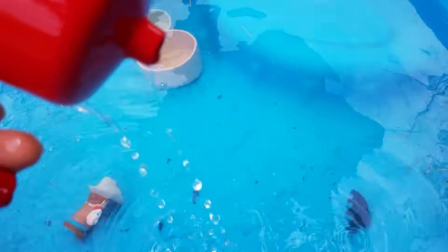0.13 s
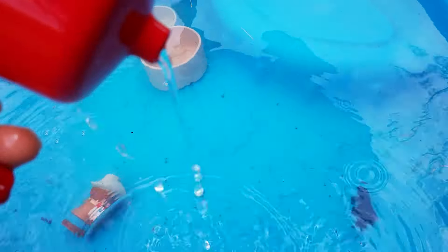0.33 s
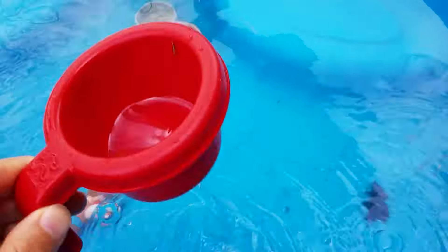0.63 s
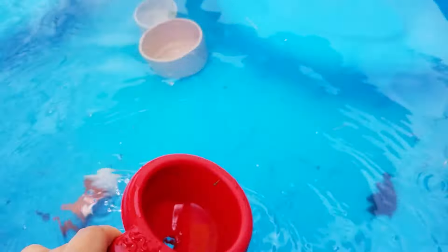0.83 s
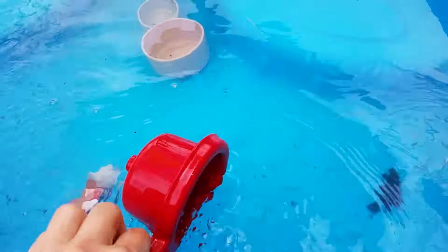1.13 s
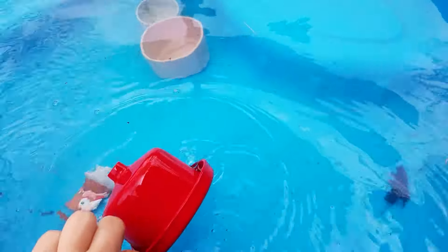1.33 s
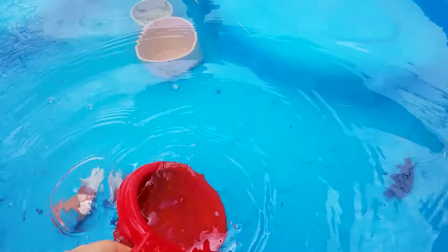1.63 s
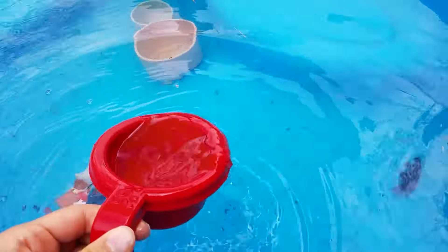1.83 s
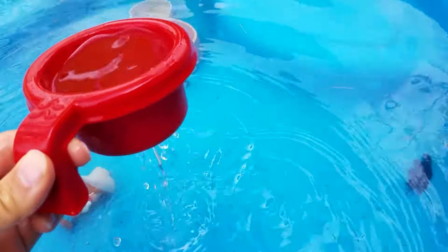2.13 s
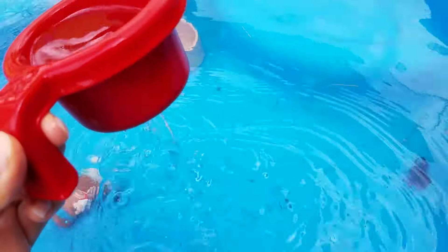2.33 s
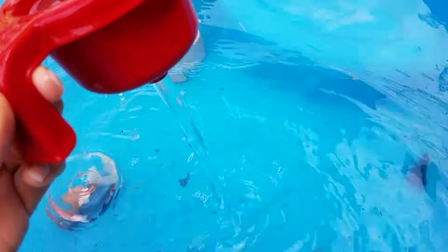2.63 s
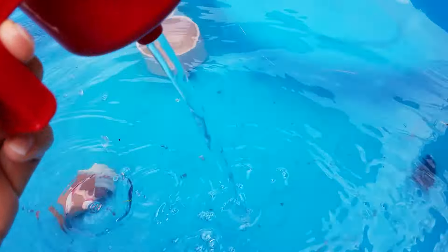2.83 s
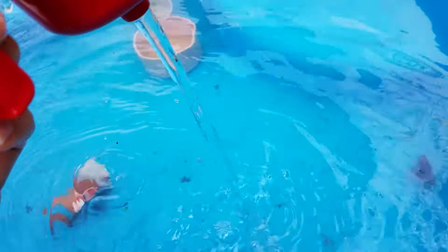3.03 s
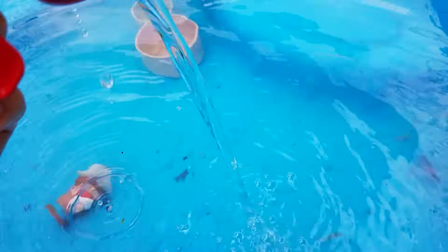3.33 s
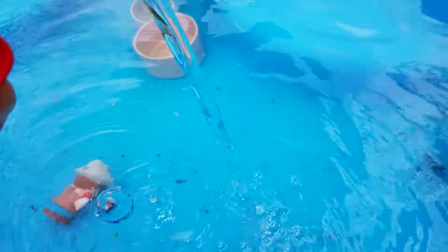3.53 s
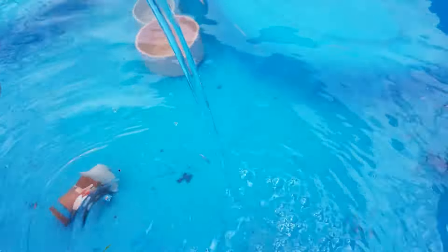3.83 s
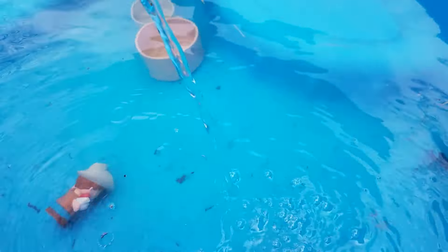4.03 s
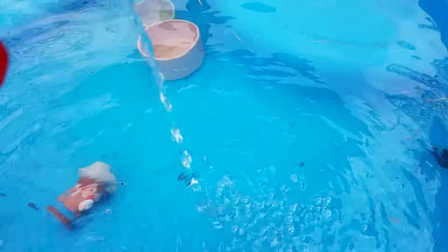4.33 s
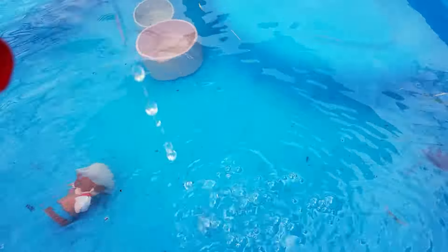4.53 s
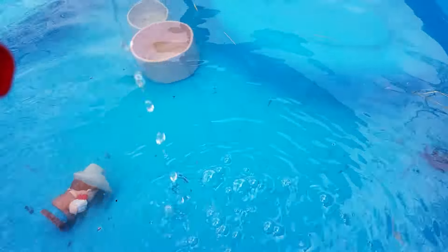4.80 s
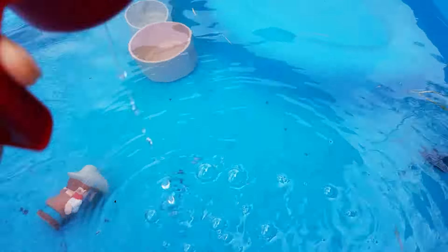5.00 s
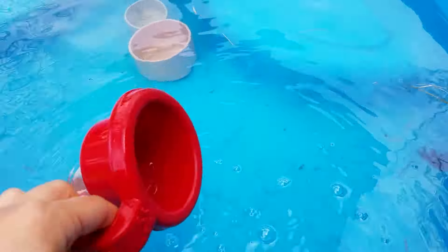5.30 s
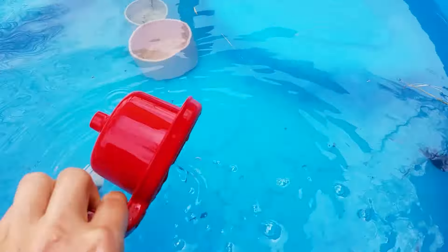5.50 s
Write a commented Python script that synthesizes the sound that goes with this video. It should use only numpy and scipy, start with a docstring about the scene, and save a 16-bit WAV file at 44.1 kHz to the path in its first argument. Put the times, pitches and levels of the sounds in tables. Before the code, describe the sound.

A thin stream of water drains from a plastic scoop into a small pool, breaking into bubbly plinks, with one hard plastic knock.

```python
"""Thin water fizzes into a paddling pool and breaks into drops that smack the surface and ring bubbles.
A toy funnel has been scooped full and held up to drain outdoors, close to a two-port microphone.
Bubbles are gliding, fading sines; drops and spray are shaped noise; the stream is swarms of small notes.
Plastic knocks once as a few decaying tones, the pool adds short echoes, and wind grows near the end."""
import sys
import numpy as np
from scipy import signal
from scipy.fft import rfft, irfft
from scipy.io import wavfile

SR = 44100
rng = np.random.default_rng(int(sys.argv[2]) if len(sys.argv) > 2 else 0)


def transcribe(u):
    """Save the signal u as a 16-bit wav file named by the first command-line argument.

    u: samples, shape (n,) or (channels, n), limited to [-1, 1]; the rate is SR.
    q: integer samples, one column per channel.
    """
    v = np.clip(np.atleast_2d(u).T, -1, 1)
    q = np.round(v * 32767).astype(np.int16)
    wavfile.write(sys.argv[1], SR, q)


N = 249606


def amp(db):
    """Decibels to linear gain."""
    return 10 ** (np.asarray(db) / 20)


def unit(x):
    """Scales a sound to an RMS of one."""
    return x / np.sqrt(np.mean(x ** 2) + 1e-20)


def add(mix, start_s, sound):
    """Lays a sound into the mix at its start time, cut off at the end."""
    part = mix[:, max(0, round(start_s * SR)):][:, :sound.shape[-1]]
    part += sound[..., :part.shape[1]]


def colour(x, points):
    """Filters x by a spectrum of (Hz, dB) points, joined along a log frequency axis."""
    hz, db = np.transpose(points)
    f = np.fft.rfftfreq(x.shape[-1], 1 / SR)
    gain = amp(np.interp(np.log(f + 1), np.log(hz), db))
    return irfft(rfft(x) * gain, x.shape[-1])


def band(x, low_hz, high_hz):
    """A gentle band-pass."""
    sections = signal.butter(2, [low_hz, high_hz], "band", fs=SR, output="sos")
    return signal.sosfilt(sections, x)


def level(table, column):
    """A dB column of a curve table as a gain for every sample."""
    rows = np.array(table)
    return amp(np.interp(np.arange(N) / SR, rows[:, 0], rows[:, column]))


def noise_pair(size, same):
    """Left and right noise; same (0-1) is the share of power common to both."""
    common, left, right = rng.standard_normal((3, size))
    same = np.clip(same, 0, 1)
    return np.sqrt(same) * common + np.sqrt(1 - same) * np.array([left, right])


def ports(sound, side):
    """As side goes from 0 to 1, sound reaches the right port later and the balance tips to the left."""
    left, right = np.broadcast_to(sound, (2, sound.shape[-1]))
    lag = int(side * 11)  # samples
    tilt = amp(3 * side - 1.3)
    return np.array([tilt * np.pad(left, (0, lag)), np.pad(right, (lag, 0)) / tilt])


def bubble(first_hz, last_hz, life_s, fade_db):
    """A bubble rings as a sine that glides from first to last pitch, fades, and stops at the end of its life."""
    t = np.arange(int(max(life_s, .0004) * SR)) / SR
    age = t / t[-1]
    pitch_hz = first_hz * (last_hz / first_hz) ** (age ** 1.9)
    turns = np.cumsum(pitch_hz) / SR
    shape = np.minimum(t * first_hz, 1) * (1 - age ** 6)  # swells over one cycle, closes softly
    return amp(-fade_db * age) * shape * np.sin(2 * np.pi * turns)


def rising(first_hz, octaves, life_s):
    """A larger bubble fades with time and each cycle, but sounds louder as it rises to the surface."""
    cycles = life_s * first_hz * 2 ** (octaves * .4)
    fade_db = 136 * life_s + 0.59 * cycles - 31 * octaves
    return bubble(first_hz, first_hz * 2 ** octaves, life_s, fade_db)


def droplets(count, low_hz, high_hz, within_s):
    """A few tiny bubbles thrown off by one impact, each a short upward chirp, weaker when later."""
    out = np.zeros((2, 1024))
    for when, pitch, size, side, rise in rng.random((count, 5)):
        hz = low_hz * (high_hz / low_hz) ** pitch
        note = bubble(hz, hz * (1 + rise ** 2 / 3), 22 / hz, fade_db=17)
        strength = (.5 + size) * (1 - when / 2)
        add(out, within_s * when ** 2, ports(strength * note, side))
    return out


def swarm(per_s, low_hz, high_hz, cycles, spread_db):
    """A steady crowd of small bubbles: the higher the note, the shorter and, on average, the stronger."""
    out = np.zeros((2, N))
    for k, (when, pitch, size, ring, rise, side) in enumerate(rng.random((int(per_s * N / SR), 6))):
        hz = low_hz + (high_hz - low_hz) * pitch ** 2
        note = bubble(hz, hz * (1 + rise ** 3 / 5), cycles * (.5 + ring) / hz, fade_db=22)
        strength = amp(spread_db * size ** 3) * np.sqrt(hz / low_hz)
        add(out, (k + 4 * when) / per_s, ports(strength * note, side ** 2))
    return unit(out)


# colour of the open air: pitch_hz [Hz], density_db [relative dB per Hz]
AIR_COLOUR = [(15, -25), (25, -47.5), (74, -14.5), (108, -31), (145, -35), (223, -13.5), (256, -15),
              (373, -10.5), (439, -13), (695, -16.5), (1130, -18.5), (4000, -29.5), (7000, -43),
              (16000, -34)]
# faint far hum: pitch_hz [Hz], width_hz [Hz at half amplitude], level_db [dB at the left port]
FAR_HUM = [(109.3, 7.9, -75.5), (376.7, 18, -68.5)]
# wind on the microphone: time_s [s], level_db [dB at the left port]
WIND_LEVEL = [(0, -64.5), (4.6, -66.5), (5.1, -57.5), (5.66, -54)]
# colour of the wind: pitch_hz [Hz], density_db [relative dB per Hz]
WIND_COLOUR = [(20, -26.5), (55, -4), (110, -6), (180, -9), (300, -19), (700, -28.5), (2000, -47)]


def outdoors(air_db=-62, right_db=2.5):
    """Quiet open air, a far hum of narrow noise bands, and low wind noise on the microphone."""
    air = amp(air_db) * unit(colour(noise_pair(N, same=0.2), AIR_COLOUR))
    f = np.fft.rfftfreq(N, 1 / SR)
    hum = np.zeros(N)
    for pitch_hz, width_hz, level_db in FAR_HUM:
        resonance = 1 / (1 + (2 * (f - pitch_hz) / width_hz) ** 2)
        hum += amp(level_db) * unit(irfft(rfft(rng.standard_normal(N)) * resonance, N))
    wind = level(WIND_LEVEL, 1) * unit(colour(noise_pair(N, same=0.94), WIND_COLOUR))
    return (air + hum + wind) * amp([[0], [right_db]])


def pool(x, wall_db=-15, wall_t60_s=0.064, yard_db=-29, yard_t60_s=0.18):
    """Quick echoes from the pool's walls and a faint tail from the yard, as decaying noise."""
    t = np.arange(SR // 3) / SR
    heard = x.copy()
    for db, t60_s in ((wall_db, wall_t60_s), (yard_db, yard_t60_s)):
        tail = noise_pair(len(t), same=.3) * amp(-60 * t / t60_s) * (t > .002)
        echoes = signal.fftconvolve(x, tail / np.linalg.norm(tail[0]), axes=1)
        heard += amp(db) * echoes[:, :N]
    return heard


def froth():
    """Bubbles left floating on the pool burst one by one with tiny ticks."""
    return amp(-74) * swarm(per_s=45, low_hz=2600, high_hz=12000, cycles=14, spread_db=16)


# knocks on hollow plastic: start_s [s], level_db [dB, scales the ring and crack]
PLASTIC_KNOCKS = [(0.8218, -13)]
# what the plastic rings with: pitch_hz [Hz], level_db [relative dB], t60_s [s]
PLASTIC_MODES = [(2837, 2, 0.021), (3590, 0, 0.017), (4390, -6, 0.014), (5420, -3, .013), (6400, 0, .014),
                 (8790, -10, .014)]


def knocks(crack_db=-8, crack_decay_s=0.0057, attack_s=0.0017):
    """A hard contact cracks as a noise burst and sets the plastic's modes ringing briefly."""
    out, t = np.zeros((2, N)), np.arange(4096) / SR
    for start_s, level_db in PLASTIC_KNOCKS:
        ring = np.zeros(len(t))
        for pitch_hz, mode_db, t60_s in PLASTIC_MODES:
            ring += amp(mode_db - 60 * t / t60_s) * np.sin(2 * np.pi * pitch_hz * t)
        grit = unit(band(noise_pair(len(t), same=.5), 1100, 12000))
        crack = amp(crack_db) * np.exp(-t / crack_decay_s) * grit
        attack = np.minimum(t / attack_s, 1)
        add(out, start_s, ports(amp(level_db) * attack * (ring + crack), side=.3))
    return out


# tiny droplets that ping without a slap: start_s [s], level_db [dB before the ports], pitch_hz [Hz]
TINY_DROPLETS = [(0.086, -32.5, 1630), (0.142, -35, 1753), (0.186, -43, 2850), (0.2757, -33.5, 3660),
                 (.2985, -42, 2130), (.5043, -38.5, 3800), (0.597, -32, 3440), (1.158, -47.5, 5340),
                 (1.767, -42, 5430), (1.844, -45, 4130), (1.872, -45.5, 3420), (1.921, -43.5, 1790),
                 (1.953, -42, 3720), (1.98, -38.5, 2670), (1.9952, -42, 3550), (2.0298, -33.5, 3470),
                 (2.391, -37.5, 3630), (2.4803, -29.5, 4700), (2.587, -39.5, 2820), (2.7832, -30, 2670),
                 (2.7816, -28, 3570), (2.93, -38, 2770), (2.9572, -34, 4400), (3.0898, -37.5, 4050),
                 (3.1159, -38, 3560), (3.2113, -38.5, 4440), (3.3942, -37, 5160), (3.486, -33.5, 4100),
                 (3.5292, -37.5, 2770), (3.578, -36, 3780), (3.6174, -38.5, 3700), (3.7016, -42, 2710),
                 (4.0805, -32, 3160), (4.1375, -38, 2800), (4.165, -26.5, 4710), (4.2218, -25.5, 3610),
                 (4.283, -27, 2870), (4.4652, -30.5, 4550), (4.466, -43, 1470), (4.4988, -41.5, 3590),
                 (5.173, -40.5, 4120), (5.495, -51.5, 1030), (5.642, -42, 6460)]


def drips(cycles=28, fade_db=17, scatter_db=-14):
    """Each tiny droplet rings one small bubble, barely gliding, with fainter ones scattered just after."""
    out = np.zeros((2, N))
    sides = rng.random(len(TINY_DROPLETS)) / 2
    for (start_s, level_db, hz), side in zip(TINY_DROPLETS, sides):
        note = bubble(hz, hz * 1.07, cycles / hz, fade_db)
        add(out, start_s, ports(amp(level_db) * note, side))
        scatter = droplets(count=4, low_hz=hz / 2, high_hz=hz * 2, within_s=.005)
        add(out, start_s, amp(level_db + scatter_db) * scatter)
    return out


# the stream meeting the water, one curve for each spell of pouring:
# time_s [s], bubble_db [dB, air driven under], spray_db [dB, spray thrown up]; both scale the layers
POUR_CURVES = [
    [(0, -56, -44.5), (.15, -54.5, -56.5), (.28, -64.5, -37.5), (.36, -52, -50.5), (.48, -58.5, -49.5),
     (.72, -50.5, -44), (.8, -56.5, -68), (.88, -60, -67)],
    [(1.8, -71, -70), (1.95, -69, -50.5), (2.1, -58, -44.5), (2.2, -68, -50), (2.28, -62.5, -73),
     (2.4, -56, -88), (2.48, -55.5, -46.5), (2.55, -58, -56.5), (2.64, -61, -81)],
    [(2.72, -60.5, -61), (2.82, -53, -44), (3.17, -56.5, -49), (3.28, -60, -56.5), (3.45, -55.5, -44.5),
     (3.59, -44, -44.5), (3.75, -62, -53.5), (3.98, -74, -61.5)],
    [(4.05, -52, -41), (4.075, -55.5, -58), (4.09, -46, -44), (4.2, -50.5, -50.5), (4.3, -52.5, -42.5),
     (4.42, -53.5, -52.5), (4.53, -50, -47), (4.62, -59, -47.5), (4.93, -56.5, -52.5), (5.0, -57, -55),
     (5.11, -67, -62)],
]


def flow(column):
    """The stream's bubbles (column 1) or spray (2) as a gain for every sample; zero between the pours."""
    t = np.arange(N) / SR
    gain = np.zeros(N)
    for pour in POUR_CURVES:
        pouring = (t >= pour[0][0]) * (t <= pour[-1][0])
        gain += level(pour, column) * pouring
    return gain


def bloops(level_db=2, low_hz=650, high_hz=2300, life_s=0.0072, spread_db=9, per_s=48):
    """Fainter bubbles, rising half an octave at most, that the falling water traps at random."""
    out = np.zeros((2, N))
    for k, (when, pitch, rise, size, side) in enumerate(rng.random((int(per_s * N / SR), 5))):
        hz = low_hz * (high_hz / low_hz) ** pitch
        note = rising(hz, .5 * rise, life_s * (.5 + rise))
        add(out, (k + when) / per_s, ports(amp(level_db - spread_db * size) * note, side))
    return out * flow(1)


def surge(depth_db):
    """Uneven gulps, some tens a second, as a random gain."""
    gulp_colour = [(6, -40), (16, 0), (45, 0), (160, -50), (1000, -100)]
    gulps = unit(colour(rng.standard_normal(N), gulp_colour))
    return unit(amp(depth_db * np.clip(gulps, -2, 1.5)))


# colour of the spray: pitch_hz [Hz], gain_db [relative dB]
SPRAY_COLOUR = [(1200, -20), (2400, -54), (3500, 19), (5000, 0.5), (7000, -8.5), (8900, 4), (10500, -1.5),
                (12500, 8), (16000, 7)]


def stream(gurgle_db=-3, blip_db=-4, ping_db=-4, pop_db=-7, spray_db=-11, churn_db=-15, seethe_db=-13):
    """The stream drags air under in uneven gulps of small bubbles and throws up fine spray as noise ticks."""
    gurgle = swarm(per_s=420, low_hz=439.8, high_hz=2193, cycles=24.5, spread_db=8.5)
    blips = swarm(per_s=170, low_hz=650, high_hz=3000, cycles=15, spread_db=17)
    pings = swarm(per_s=650, low_hz=2500, high_hz=5600, cycles=19, spread_db=13)
    pops = swarm(per_s=600, low_hz=5000, high_hz=13000, cycles=12, spread_db=23)
    # about 380 random ticks a second, each decaying over 3 ms
    hits = amp(28 * rng.random(N) ** 3) * (rng.random(N) < 380 / SR)
    ticks = signal.lfilter([1], [1, -np.exp(-1 / (.003 * SR))], hits)
    churn_colour = [(120, -28.0), (300, -14.0), (550, -13.5), (1200, 35), (3000, -7.0), (8000, -88.5)]
    churn = unit(colour(ticks * noise_pair(N, same=0.2), churn_colour))
    spray = unit(colour(ticks * noise_pair(N, same=0.21), SPRAY_COLOUR))
    seethe = unit(band(ticks * noise_pair(N, same=0.15), low_hz=1440, high_hz=4600))
    low = amp(gurgle_db) * gurgle + amp(blip_db) * blips
    low += amp(churn_db) * churn + amp(seethe_db) * seethe
    high = amp(pop_db) * unit(colour(pops, SPRAY_COLOUR)) + amp(spray_db) * spray
    under = surge(depth_db=4) * flow(1) * low
    above = surge(depth_db=5) * (flow(1) * amp(ping_db) * pings + flow(2) * high)
    return under + above


# drops smacking the water: start_s [s], snap_db [relative dB, bright snap], splash_db [relative dB]
SMACKING_DROPS = [(.028, -24.5, -58), (0.0798, -33, -36.5), (0.111, -32, -60), (0.1515, -43, -40),
                  (0.1852, -34, -40), (.25, -31, -43), (0.2918, -51, -37), (0.2991, -26, -38.5),
                  (0.3923, -39, -38.5), (0.408, -34.5, -36.5), (0.5041, -31.5, -38.5), (0.534, -33, -44),
                  (.545, -31.5, -65), (0.6488, -9.5, -39), (0.764, -23.5, -31), (0.7702, -18, -33),
                  (0.9587, -42, -76), (1.411, -48, -49.5), (1.923, -39, -44), (2.0145, -25, -48),
                  (2.0746, -30.5, -52), (2.176, -33.5, -55), (2.2384, -35, -58), (2.3453, -29, -45.5),
                  (2.408, -31, -58), (2.462, -40, -40), (2.585, -49, -44.5), (2.9718, -51, -41.5),
                  (3.035, -30, -45.5), (3.164, -40.5, -45), (3.4416, -25.5, -38.5), (3.501, -24.5, -44),
                  (3.5465, -24.5, -44), (3.5848, -39, -42), (3.692, -31, -45.5), (4.0789, -31, -41),
                  (4.118, -37, -38.5), (4.176, -30, -44), (4.2217, -36.5, -42), (4.257, -31.5, -43),
                  (4.284, -32, -35.5), (4.33, -32, -64), (4.407, -26, -37), (4.4245, -26, -54),
                  (4.473, -24.5, -40.5), (4.5182, -51, -32), (4.614, -30.5, -62), (4.655, -22, -44),
                  (4.733, -62, -39), (4.862, -35, -40.5), (4.894, -26.5, -55), (4.9211, -42, -35.5),
                  (5.0423, -28.5, -61), (5.065, -30.5, -39), (5.079, -35, -47.5), (5.192, -32.5, -59),
                  (5.36, -30, -49)]


def smacks(snap_s=0.000074, swell_s=0.000081, splash_s=0.0027, dent_s=0.014,
           dent_db=-15, hiss_db=-4, snap_trim_db=-13, droplets_db=-5, delay_s=0.00045):
    """Each drop snaps, splashes and throws a few tiny bubbles; its dent sounds lower and longer."""
    lead_s = .001  # room for a brief swell before the snap
    out, t = np.zeros((2, N)), np.arange(1024) / SR - lead_s
    swell, after = np.exp(np.minimum(t, 0) / swell_s), np.maximum(t, 0)
    wash = np.exp(-after / splash_s)
    sharp = np.exp(-after / snap_s) + wash
    dent = np.exp(-after / dent_s)
    brief = np.sqrt(.006 * SR / len(t))  # gives each burst the energy of 6 ms at its level
    sides = rng.uniform(.2, .7, len(SMACKING_DROPS))
    for (start_s, snap_db, splash_db), side in zip(SMACKING_DROPS, sides):
        # low_hz, high_hz, shape, level_db, share common to both ports
        parts = [(700, 2200, dent, (splash_db + snap_db) / 2 + dent_db, .85),
                 (2200, 6000, sharp + wash, splash_db + hiss_db, .6),
                 (6000, 15500, sharp, snap_db + snap_trim_db, .3)]
        for low_hz, high_hz, shape, part_db, same in parts:
            burst = unit(band(noise_pair(len(t), same) * swell * shape, low_hz, high_hz))
            add(out, start_s + delay_s - lead_s, ports(amp(part_db) * brief * burst, side))
        tiny = droplets(count=4, low_hz=2400, high_hz=6500, within_s=.009)
        add(out, start_s + delay_s, amp(splash_db + droplets_db) * brief * unit(tiny))
    return out


# single trapped bubbles:
# start_s [s], level_db [dB, scales slap and ring], pitch_hz [Hz at first], rise_octaves [octaves], life_s [s]
TRAPPED_BUBBLES = [(0, -29, 934, 0.39, .039), (0.0317, -38, 1033, 0.68, 0.028),
                   (.081, -26.5, 984, -0.079, 0.067), (.1089, -31.5, 740, 0.74, .042),
                   (0.163, -40, 1160, 0.2, 0.028), (0.192, -48.5, 940, 1.7, 0.047),
                   (0.311, -34, 970, 0.72, 0.0224), (.3408, -26, 1132, 0.46, 0.0193),
                   (.3607, -33, 828, -0.52, .051), (0.3922, -29, 996, 0.45, .011),
                   (.404, -42.5, 720, 0.93, .042), (0.4482, -38.5, 1340, 0.12, .014),
                   (.509, -52, 1810, .4, 0.018), (0.5444, -35.5, 846, 0.57, 0.043),
                   (.581, -37, 637, 0.94, 0.092), (0.6162, -30.5, 2090, 0.45, 0.022),
                   (.6479, -26, 545, 0.38, .092), (.655, -37.5, 705, 0.94, .07),
                   (0.7047, -31.5, 1815, -0.03, 0.032), (0.716, -25, 509, -0.32, 0.125),
                   (1.029, -49.5, 1040, -0.28, 0.035), (1.359, -40.5, 970, -0.39, 0.034),
                   (1.409, -36.5, 1020, -.95, 0.013), (1.8105, -44, 1780, .18, 0.017),
                   (2.0383, -43, 1490, -0.16, 0.038), (2.076, -41, 960, -.9, .028),
                   (2.1167, -32.5, 2760, 0.18, 0.015), (2.1181, -32.5, 1094, 0.29, 0.053),
                   (2.178, -40, 737, -0.54, .023), (2.4004, -33.5, 1270, -.2, 0.0092),
                   (2.463, -37, 1396, -0.021, .026), (2.474, -35.5, 775, -0.4, .066),
                   (2.7965, -31.5, 950, -0.024, .014), (2.798, -35.5, 1250, 0.25, 0.047),
                   (2.883, -37.5, 1790, -0.12, 0.032), (2.8837, -40, 1004, -0.13, 0.028),
                   (2.988, -34.5, 1140, 0.22, 0.01), (3.0355, -43, 534, 0.00024, .039),
                   (3.166, -40, 1785, -0.11, 0.03), (3.368, -38.5, 299, -0.46, 0.071),
                   (3.4036, -38, 814, -0.46, 0.037), (3.5001, -38.5, 519, -0.064, 0.037),
                   (3.541, -39, 1010, -0.083, .016), (3.5845, -29.5, 1206, -0.78, 0.015),
                   (3.638, -45, 1330, 0.98, 0.025), (4.0508, -42, 1140, 0.17, 0.0058),
                   (4.08, -28.5, 766, 0.15, 0.0106), (4.085, -34, 567, 0.083, 0.019),
                   (4.1227, -38, 590, -.19, 0.017), (4.1485, -35, 544, 0.3, 0.05),
                   (4.227, -36.5, 495, -0.053, 0.033), (4.2569, -30, 516, 0.14, .1),
                   (4.293, -30, 485, 0.13, 0.39), (4.2987, -36.5, 1174, 0.069, 0.0096),
                   (4.3421, -23, 459, 0.4, 0.051), (4.352, -50, 997, 0.49, 0.018),
                   (4.406, -34.5, 842, -0.026, 0.018), (4.429, -37, 1236, .27, 0.0106),
                   (4.476, -46.5, 970, 0.88, 0.043), (4.512, -32.5, 695, 0.37, 0.062),
                   (4.5365, -31.5, 1755, -.28, .035), (4.5966, -35.5, 764, 0.36, 0.0336),
                   (4.6188, -40, 803, 0.54, 0.037), (4.6542, -33, 1034, 0.47, 0.0088),
                   (4.6987, -47, 834, 0.94, 0.032), (4.7538, -39, 810, 0.86, 0.025),
                   (4.8011, -33, 1090, -0.31, 0.024), (4.864, -39, 743, 1.17, 0.077),
                   (4.9211, -44, 743, 1.16, 0.051), (4.9219, -31, 1920, -0.36, 0.034),
                   (5.014, -48, 1010, 0.56, 0.015), (5.0435, -40.5, 1770, 0.49, .016)]
# ringing of the hollow that a deep bubble leaves: pitch_hz [Hz before size], level_db [relative dB], t60_s [s]
HOLLOW_MODES = [(550, -47, 0.093), (860, -12, 0.12), (1097, -6, 0.043)]


def plinks(slap_db=-6, slap_decay_s=0.0041, softer_db_per_octave=16, deep_hz=560):
    """Each bubble pinches off with a dull slap, gentler if shallow and rising, then rings as a clear note."""
    out, t = np.zeros((2, N)), np.arange(4096) / SR
    for start_s, level_db, hz, octaves, life_s in TRAPPED_BUBBLES:
        thud = band(band(rng.standard_normal(len(t)), 450, 2400), 450, 2400)
        slap = np.exp(-t / slap_decay_s) * unit(thud)
        size = rng.uniform(.94, 1.06)  # scales the hollow's pitches
        hollow = np.zeros(len(t))
        for mode_hz, mode_db, t60_s in HOLLOW_MODES:
            hollow += amp(mode_db - 60 * t / t60_s) * np.sin(2 * np.pi * mode_hz * size * t)
        depth = min(deep_hz / hz, 1) ** 2  # low bubbles leave the fullest hollow
        pinch = amp(slap_db) * slap + depth * hollow
        softer = amp(-softer_db_per_octave * max(octaves, 0))
        for sound in (softer * pinch, rising(hz, octaves, life_s)):
            add(out, start_s, ports(amp(level_db) * sound, side=.4))
    return out


def scene():
    """Bubbles, drops, stream, froth and knock in the pool, under the open air."""
    water = plinks() + bloops() + smacks() + drips() + stream() + froth()
    return pool(water + knocks()) + outdoors()


# the recorder's body shifts the right port's phase: pitch_hz [Hz], shift_rad [radians]
BODY_SHADING = [(1200, -0.027), (2100, -0.33), (2600, -0.43), (3600, 1.66), (4700, 0.46)]


def record(dry, right_db=-0.07, edge_hz=16200):
    """The two microphone ports differ a little in phase and level; then comes the recorder's band limit."""
    shift_rad = np.interp(np.fft.rfftfreq(N, 1 / SR), *np.transpose(BODY_SHADING))
    right = amp(right_db) * irfft(rfft(dry[1]) * np.exp(1j * shift_rad), N)
    heard = np.array([dry[0], right])
    low_pass = signal.firwin(301, edge_hz, window=("kaiser", 8), fs=SR)
    return signal.oaconvolve(heard, low_pass[None], "same")


dry = scene()
out = record(dry)
transcribe(out)
```